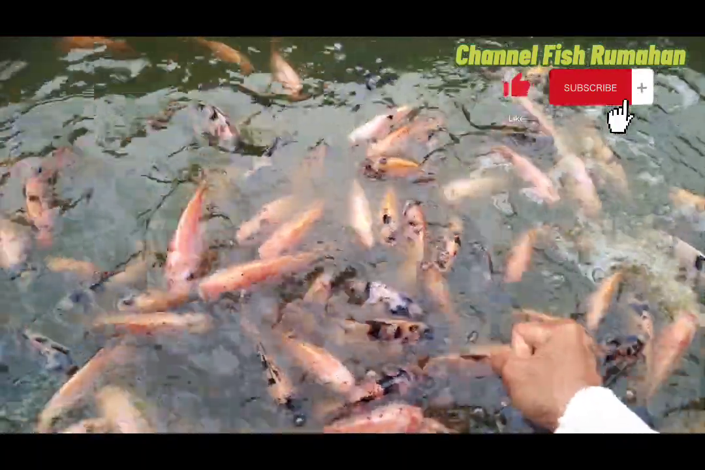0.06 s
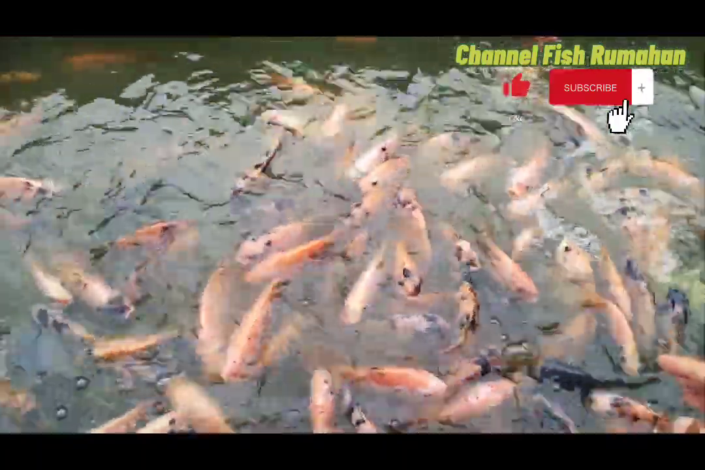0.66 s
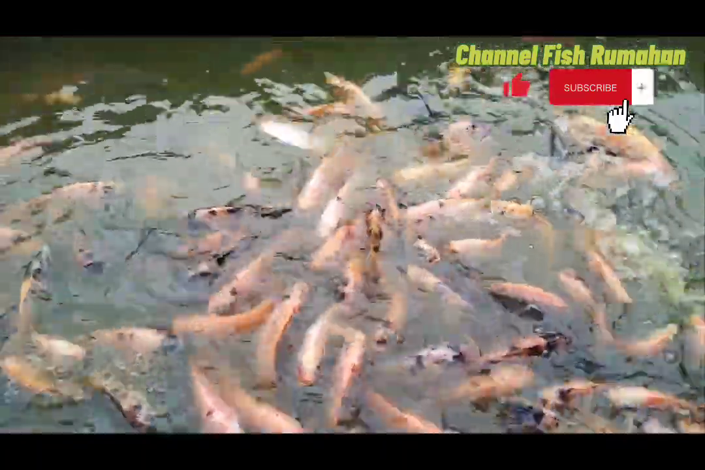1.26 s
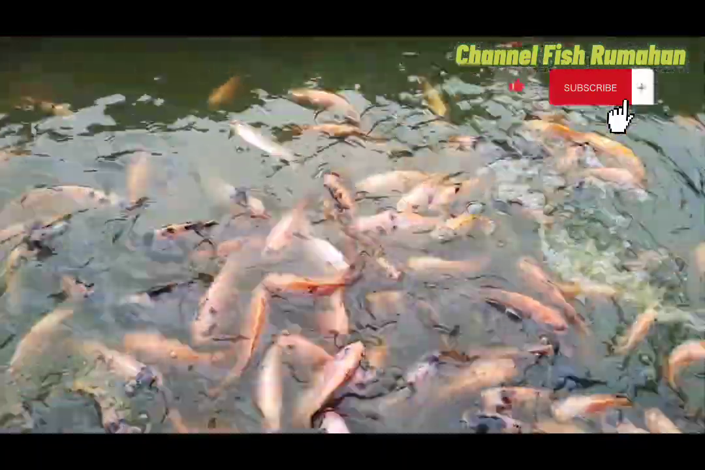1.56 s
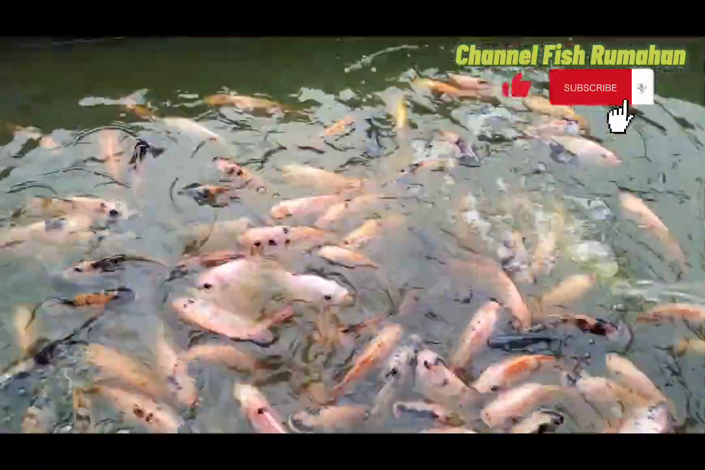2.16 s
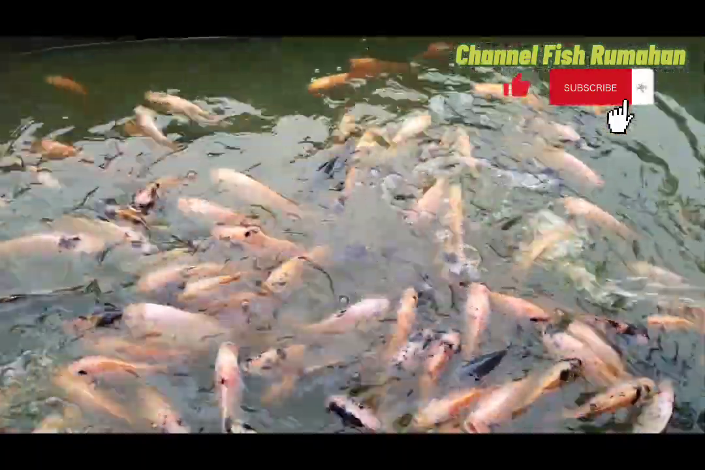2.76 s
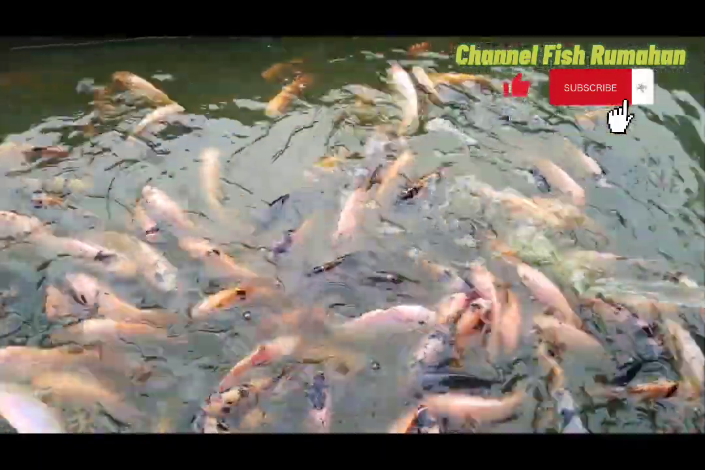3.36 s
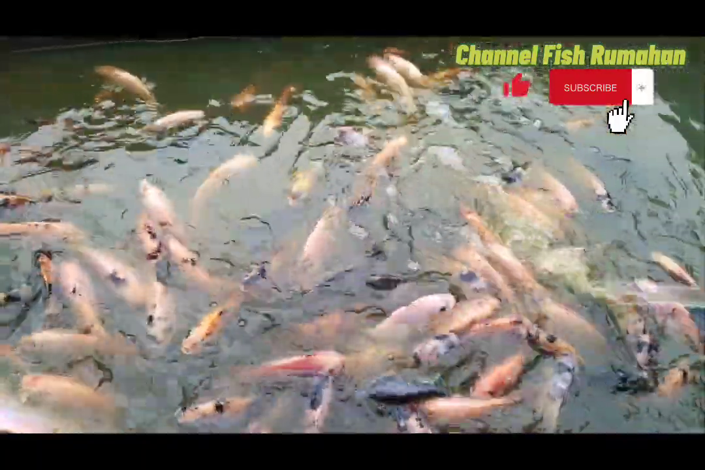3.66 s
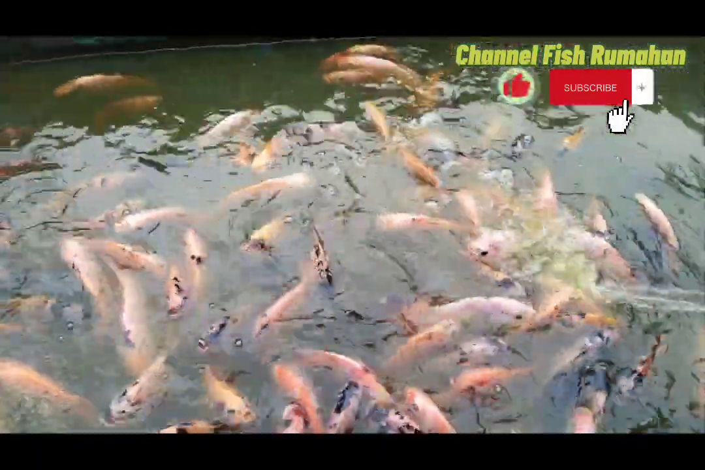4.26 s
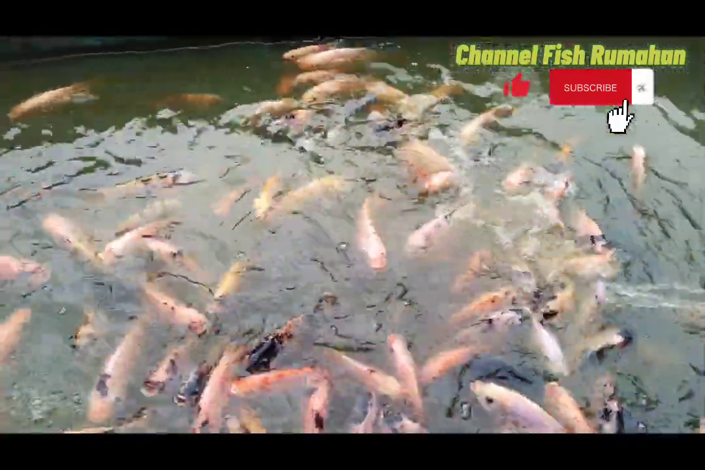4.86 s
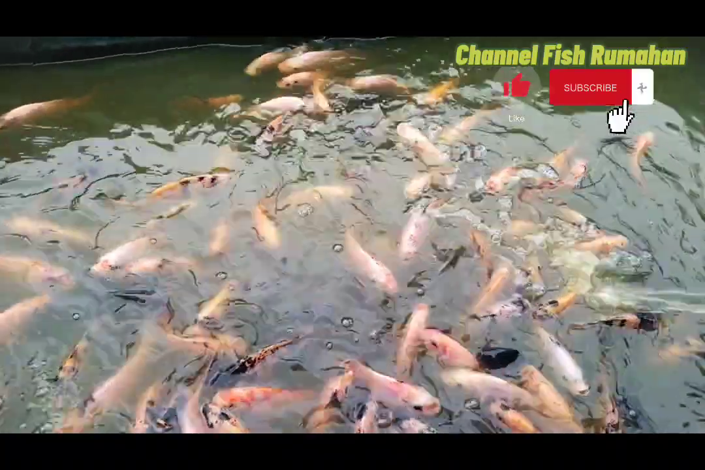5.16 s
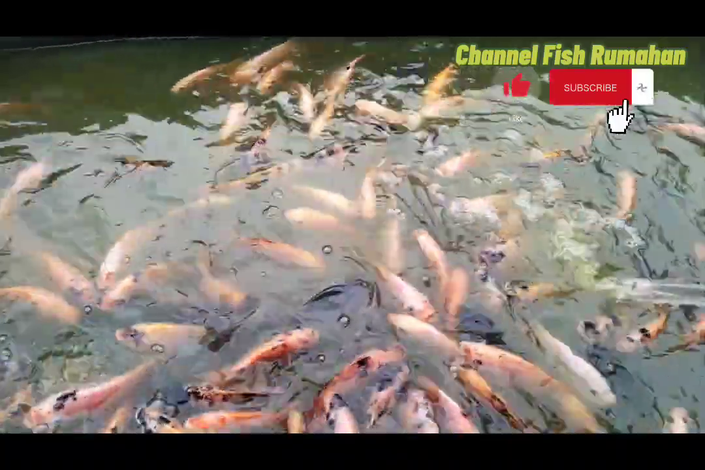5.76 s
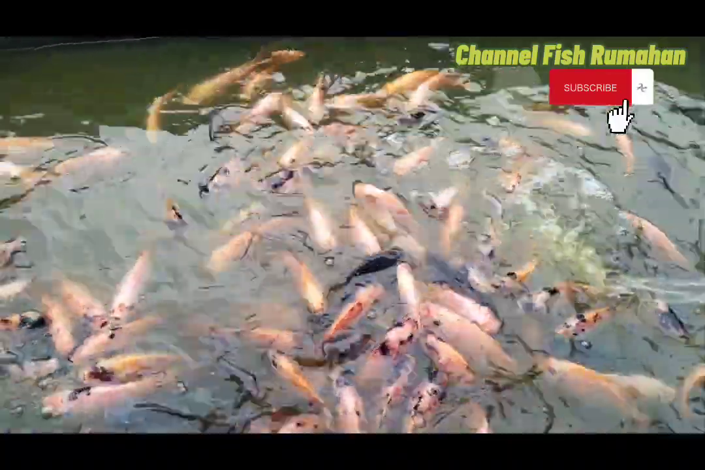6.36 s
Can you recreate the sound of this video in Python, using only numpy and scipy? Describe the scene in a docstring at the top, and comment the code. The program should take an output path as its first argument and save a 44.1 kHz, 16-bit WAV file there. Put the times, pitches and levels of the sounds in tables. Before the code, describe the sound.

A crowd of feeding fish thrashes at the surface of an outdoor pond, close to the microphone. Rapid small splashes overlap from start to finish, full of ringing bubbles, sharp plops, low gulps and soft sipping blips. Around the middle, several tail slaps thump and slosh. Thrown water tinkles back and a few hard drops land nearby. Behind it all, falling water fizzes steadily, briefly swelling to a gush in the second half.

```python
"""Fish thrash at the surface of a pond, close by; each thrash leaves a ringing cloud of bubbles.
Single bubbles plop, tail slaps thump and slosh, mouths gulp and sip air, fins open swirling hollows.
Thrown water falls back as tinkling bubbles; a few hard drops land close by.
Behind them is a steady fizz of falling water, at times swelling to a gush.
The single events echo off the banks, over still outdoor air."""
import sys
import numpy as np
from scipy import signal
from scipy.io import wavfile
from scipy.ndimage import uniform_filter1d

SR = 44100
rng = np.random.default_rng(int(sys.argv[2]) if len(sys.argv) > 2 else 0)


def unload_audio(sound):
    """Save the sound as a 16-bit wav file, at the path given as the first command line argument."""
    columns = np.transpose(np.atleast_2d(sound))
    # keep every value between -1 and 1, then stretch to whole-number steps
    steps = np.round(np.clip(columns, -1, 1) * 32767)
    wavfile.write(sys.argv[1], SR, steps.astype(np.int16))


N = 287399
T = np.arange(N) / SR

# bubble cloud per thrash: start_s, length_s, large_db, medium_db, small_db, large_pitch_hz
THRASHES = [(0, 0.007, -37, -59, -24, 1123), (0.042, 0.15, -37.5, -51, -31.5, 1180),
            (0.201, 0.26, -35.5, -36, -36.5, 1087), (0.55, 0.12, -31.5, -34.5, -33.5, 1007),
            (0.702, 0.05, -30.5, -48, -28.5, 1086), (0.857, 0.1, -31.5, -30, -34, 1344),
            (0.963, 0.23, -33, -28, -37, 1050), (1.119, 0.13, -48, -34, -31.5, 960),
            (1.311, 0.17, -43.5, -37.5, -31, 797), (1.582, 0.24, -47.5, -39, -32.5, 803),
            (1.693, 0.16, -34.5, -29, -36, 806), (1.902, 0.1, -36.5, -35.5, -32, 853),
            (2.028, 0.11, -44.5, -32.5, -27.5, 880), (2.169, 0.16, -32.5, -47, -31.5, 1205),
            (2.424, 0.16, -51, -38, -34, 830), (2.624, 0.44, -36.5, -39, -34, 769),
            (2.738, 0.21, -41, -28, -34, 884), (2.965, 0.15, -36, -28, -38, 1036),
            (3.131, 0.093, -46.5, -26.5, -29.5, 802), (3.237, 0.17, -32, -27.5, -36, 857),
            (3.41, 0.097, -42, -32, -35, 960), (3.739, 0.076, -31, -31.5, -32.5, 1060),
            (3.845, 0.27, -71, -32.5, -38, 1004), (4.01, 0.23, -41, -33, -57, 980),
            (4.229, 0.018, -64, -27, -26, 1080), (4.3, 0.1, -33.5, -35, -32, 845),
            (4.464, 0.11, -74, -34.5, -27.5, 930), (4.577, 0.19, -50, -35.5, -32.5, 960),
            (4.907, 0.096, -45, -31, -30.5, 802), (5.152, 0.095, -32.5, -33.5, -29.5, 1287),
            (5.381, 0.057, -24.5, -28, -31.5, 1280), (5.451, 0.22, -47, -36.5, -37, 1167),
            (5.622, 0.17, -35.5, -31.5, -45, 970), (5.74, 0.24, -37, -32, -39, 933),
            (6.092, 0.13, -35, -31, -39, 1083), (6.326, 0.16, -38.5, -32, -30, 1110)]


def thrashing():
    """Amplitude curves of large, medium and small bubbles: thrashes over the crowd's steady simmer."""
    simmer_db = (-61, -47.5, -38.5)
    power = amp(simmer_db)[:, None] ** 2 * np.ones(N)
    for start_s, length_s, *levels_db, _ in THRASHES:
        power += amp(levels_db)[:, None] ** 2 * stir_power(start_s, length_s, rise_s=0.021, t60_s=0.23)
    return np.sqrt(power)


def churn(envelopes):
    """Three sizes of bubble: the bigger, the deeper and rarer."""
    large = cloud(latest_pitch(THRASHES), octaves=0.526, per_s=150, t60_cycles=44, spread_db=3, glide=0.06)
    medium = cloud(1739.6, octaves=0.357, per_s=280, t60_cycles=96, spread_db=5, glide=0.0064)
    small = cloud(2993, octaves=0.596, per_s=600, t60_cycles=95, spread_db=5, glide=0.016)
    return sum(level * ringing(size) for level, size in zip(envelopes, [large, medium, small]))


def bubble(hz, t60_s, glide, onset_cycles):
    """An air pocket rings down; nearing the surface, its pitch climbs by the fraction glide per t60_s."""
    t = np.arange(int(1.2 * t60_s * SR) + 8) / SR
    cycles = hz * (t + glide * t ** 2 / (2 * t60_s))
    envelope = (1 - np.exp(-(cycles / onset_cycles) ** 2)) * np.exp(-np.log(1000) * t / t60_s)
    return envelope / envelope.max() * np.sin(2 * np.pi * cycles)


def cloud(centre_hz, octaves, per_s, t60_cycles, spread_db, glide):
    """Bubbles born at random times, scattered in pitch, level, life and glide."""
    out, centre_hz = np.zeros(N), centre_hz * np.ones(N)
    draws = np.random.default_rng(rng.integers(2 ** 31)).random((int(per_s * N / SR), 6))
    for when, up, down, strength, life, climb in draws:
        hz = centre_hz[int(when * N)] * 2 ** (octaves * (up - down))
        db = spread_db * min(-np.log(1 - strength), 4)
        t60_s = t60_cycles * (0.5 + life) / hz
        add(out, when * N / SR, amp(db) * bubble(hz, t60_s, 2 * glide * climb, onset_cycles=2.23))
    return out


def ringing(bubbles):
    """Bubbles get a ringing tone colour; narrow bands swell and fade at random. Unit power."""
    rung = colour(bubbles, ring_colour())
    return steady(shimmer(rung, depth_db=16.5, life_s=0.15, width_hz=100), span_s=0.066)


def ring_colour():
    """Fixed ringing peaks that colour the bubbles and splashes, summed to freq_hz, gain_db."""
    # centre_hz, width_hz, gain_db
    ring_peaks = [(294, 69, 6), (621, 116, 4), (763.6, 74, 7.5), (1100, 140, 0), (1338, 103, 8.5),
                  (1541.4, 61, 15), (1784, 215, 2), (1931, 55, 12), (2521, 23, 8), (2730, 162, 12.5),
                  (2912, 57, 8), (3080, 68, 6.5), (3450, 380, -0.5), (3678, 77, 8), (4235, 280, 3)]
    hz = np.geomspace(200, 6000, 500)
    power = sum(amp(db) ** 2 / (1 + ((hz - centre_hz) / (width_hz / 2)) ** 2) ** 1.36
                for centre_hz, width_hz, db in ring_peaks)
    return np.column_stack([hz, 10 * np.log10(power)])


def plops():
    """Single loud bubbles, each inside its own short splash."""
    # start_s, peak_db, pitch_hz, t60_s, splash_rel_db
    loud_bubbles = [(0.609, -18, 2520, 0.028, -7.5), (0.2176, -16.5, 2490, 0.035, -14),
                    (0.2878, -14.5, 886, 0.027, -13), (1.0238, -26, 817, 0.19, 4),
                    (1.092, -10.5, 2830, 0.017, -11), (1.1427, -10, 1520, 0.017, -2),
                    (1.267, -21.5, 3260, 0.012, -1), (1.343, -16, 1864, 0.038, -21),
                    (1.4222, -18.5, 2310, 0.025, -4.5), (1.721, -8.5, 2570, 0.0075, -37),
                    (1.8314, -26, 808, 0.11, -17), (1.833, -13, 1390, 0.0075, -7),
                    (1.8618, -3, 2830, 0.0075, -17.5), (1.992, -10, 1358, 0.04, -16.5),
                    (2.058, -11, 2550, 0.011, -14), (2.188, -15, 880, 0.0093, -1),
                    (2.4972, -8, 3120, 0.0089, -17), (2.5389, -17.5, 902, 0.028, -49),
                    (2.6142, -13, 2840, 0.025, -32), (2.7889, -8.5, 1590, 0.041, -7),
                    (2.861, -24.5, 1520, 0.07, 7.5), (3.028, -15.5, 1185, 0.049, -9),
                    (3.033, -19, 1630, 0.06, 3), (3.159, -12.5, 2800, 0.017, -30),
                    (3.2008, -27.5, 655, 0.074, -2), (3.2665, -15, 916, 0.042, -29),
                    (3.495, -13.5, 3020, 0.015, -6), (3.518, -8, 964, 0.021, -26),
                    (3.552, -13.5, 3400, 0.018, -11.5), (3.7655, -11, 950, 0.0052, -34),
                    (3.879, -4.5, 2650, 0.0084, -20), (4.0327, -12, 2890, 0.014, -13),
                    (4.038, -8.5, 843, 0.014, -22), (4.0382, -7.5, 1160, 0.018, -15),
                    (4.162, -19, 804, 0.029, -7.5), (4.2964, -13, 934, 0.019, -5),
                    (4.343, -22, 944, 0.03, -1), (4.3827, -14, 800, 0.0095, -10),
                    (4.616, -19, 970, 0.057, -3.5), (4.646, -14, 937, 0.015, -24),
                    (5.4026, -9, 2220, 0.0067, -46), (5.588, -18, 2940, 0.058, -9),
                    (5.716, -16.5, 2800, 0.013, -9), (5.717, -15.5, 1910, 0.027, -5),
                    (6.156, -13.5, 1780, 0.016, -22), (6.157, -13.5, 3610, 0.042, -37),
                    (6.342, -19.5, 3010, 0.025, -2.5)]
    out = np.zeros(N)
    for start_s, db, hz, t60_s, splash_rel_db in loud_bubbles:
        add(out, start_s, amp(db) * bubble(hz, t60_s, glide=0.085, onset_cycles=2.77))
        add(out, start_s, amp(db + splash_rel_db) * splash(hz))
    return out


def splash(hz):
    """Water tears around a bubble: a short rush with a ringing colour."""
    band = [(hz * 0.33, -28), (hz, 0), (hz * 1.29, 0), (hz * 1.96, -24)]
    rush = burst(band, attack_s=0.0014, decay_s=0.008, wash_db=-21, wash_s=0.023)
    rung = colour(rush, ring_colour())
    return rung * rush.std() / rung.std()


def burst(spectrum, attack_s, decay_s, wash_db, wash_s):
    """Rush of torn water: quick rise, fast fall, weaker wash."""
    t = np.arange(SR // 3) / SR
    envelope = (1 - np.exp(-t / attack_s)) * (np.exp(-t / decay_s) + amp(wash_db) * np.exp(-t / wash_s))
    noise = rng.standard_normal(len(t))
    return colour(noise * envelope / envelope.max(), spectrum) / colour(noise, spectrum).std()


def tail_slaps():
    """A tail shoves the water: a thump with a deep note, then the hollow rings as it sloshes shut."""
    # start_s, level_db, slosh_rel_db
    slaps = [(2.534, -32.5, -4), (2.771, -41.5, 2), (3.02, -28, 9.5), (3.262, -24.5, 8), (3.505, -24, -3),
             (3.753, -28, 9), (4.026, -26.5, 2.5), (4.612, -26, 8), (5.093, -43, -11)]
    # freq_hz, gain_db
    thump_spectrum = [(45, -43), (80, -20), (112, -2), (170, 0), (300, 6), (450, -9.5), (900, -58)]
    # freq_hz, gain_db
    slosh_spectrum = [(250, -20), (450, -7), (950, -10), (1500, -21), (3000, -19.5), (8000, -36)]
    # pitch_hz, level_re_slosh_db, t60_s
    hollow_modes = [(288, -19.5, 0.031), (581, -8.5, 0.029), (1000, -3, 0.04), (1218, -3, 0.059)]
    out = np.zeros(N)
    for start_s, db, slosh_rel_db in slaps:
        thump = burst(thump_spectrum, attack_s=0.015, decay_s=0.012, wash_db=-20.5, wash_s=0.1)
        add(out, start_s, amp(db - 6) * thump)
        add(out, start_s + 0.0026, amp(db - 0.5) * bubble(124, 0.033, glide=0.26, onset_cycles=1.3))
        slosh = burst(slosh_spectrum, attack_s=0.0052, decay_s=0.005, wash_db=-25, wash_s=0.043)
        add(out, start_s + 0.00343, amp(db + slosh_rel_db - 3) * colour(slosh, ring_colour()))
        for hz, mode_db, t60_s in hollow_modes:
            ring = bubble(hz, t60_s, glide=0.05, onset_cycles=2.8)
            add(out, start_s + 0.00526, amp(db + slosh_rel_db + mode_db) * ring)
    return out


def gulps(large_envelope):
    """A mouth gulps air: one deep bubble, then a dying gurgle. Large bubbles stir the gurgle too."""
    # start_s, peak_db, pitch_hz
    air_pockets = [(0.323, -21.5, 307), (1.139, -26.5, 365), (1.827, -32, 353), (2.108, -34, 330),
                   (2.167, -29, 288), (3.28, -24.5, 279), (3.811, -33.5, 285), (4.152, -32.5, 258),
                   (5.195, -35, 490), (5.272, -22, 333), (5.439, -31, 393), (5.582, -25.5, 296),
                   (5.647, -26, 277), (6.091, -27.5, 288), (6.174, -29, 306), (6.347, -34.5, 268)]
    stirred_rel_db, gurgle_rel_db = -27, -12
    out, power = np.zeros(N), (amp(stirred_rel_db) * large_envelope) ** 2
    for start_s, db, hz in air_pockets:
        add(out, start_s, amp(db) * bubble(hz, t60_s=0.11, glide=0.02, onset_cycles=2.2))
        power += amp(db + gurgle_rel_db) ** 2 * stir_power(start_s, 0, rise_s=0.027, t60_s=0.98)
    gurgle = cloud(307.3, octaves=0.51, per_s=87, t60_cycles=15.2, spread_db=-3, glide=0.29)
    return out + np.sqrt(power) * ringing(gurgle)


def sips():
    """A mouth sips at the surface and frees a bubble: a soft, rising blip."""
    # start_s, peak_db, pitch_hz
    blips = [(0.082, -20.5, 1020), (0.183, -19.5, 1175), (0.219, -20.5, 1284), (0.45, -21.5, 1028),
             (0.565, -27, 1510), (0.692, -20.5, 1520), (0.724, -22.5, 1272), (1.592, -18.5, 2566),
             (2.042, -25, 1014), (2.092, -16.5, 1514), (2.249, -20, 1246), (2.372, -24, 736),
             (2.448, -23.5, 1495), (2.83, -18, 1920), (2.858, -19.5, 3350), (3.837, -20.5, 1517),
             (3.997, -20, 1550), (5.521, -19, 1806), (5.678, -17, 1760), (5.878, -23.5, 1070),
             (6.435, -18, 1890)]
    out = np.zeros(N)
    for start_s, db, hz in blips:
        add(out, start_s, amp(db) * bubble(hz, t60_s=0.038, glide=0.08, onset_cycles=7.2))
    return out


def fin_swirls():
    """A fin opens a hollow whose noisy ring falls as it widens."""
    # start_s, level_db, start_pitch_hz
    hollows = [(1.002, -24, 2296), (1.1, -22, 2470), (5.403, -22, 2190), (5.951, -24.5, 2360),
               (6.043, -24, 2525), (6.094, -22.5, 2253)]
    life_s, floor_ratio, pole_width_hz = 0.041, 0.58, 320
    out, t = np.zeros(N), np.arange(int(2 * life_s * SR)) / SR
    age = t / life_s
    envelope = (1 - np.exp(-t / 0.0012)) * np.exp(-2 * age ** 2)
    pole = np.exp(-np.pi * pole_width_hz / SR)
    for start_s, db, hz in hollows:
        cycles = np.cumsum(hz * (floor_ratio + (1 - floor_ratio) * np.exp(-2 * age))) / SR
        noise = rng.standard_normal(len(t)) + 1j * rng.standard_normal(len(t))
        baseband = signal.lfilter([1], np.poly([pole, pole]), noise)
        ring = steady((baseband * np.exp(2j * np.pi * cycles)).real, span_s=0.012)
        add(out, start_s, amp(db) * envelope / envelope.max() * ring)
    return out


def tinkles():
    """Thrown water falls back and leaves tiny bubbles of much the same size."""
    # start_s, length_s, level_db, pitch_hz
    showers = [(0, 0.37, -34.5, 4030), (0.426, 0.023, -32, 4690), (0.545, 0.06, -32, 3920),
               (0.914, 0.4, -39, 5470), (1.28, 0.19, -41.5, 3980), (1.566, 0.03, -30, 4110),
               (1.9, 0.24, -41, 4140), (2.29, 0.11, -33, 6890), (2.498, 0.14, -32.5, 3610),
               (3.655, 0.081, -32.5, 3850), (3.869, 0.074, -33, 4490), (5.395, 0.026, -34, 5490),
               (6.333, 0.074, -39, 4600)]
    power = sum(amp(db) ** 2 * stir_power(start_s, length_s, rise_s=0.013, t60_s=0.24)
                for start_s, length_s, db, _ in showers)
    pitch_hz = latest_pitch(showers)
    tiny = cloud(pitch_hz, octaves=0.162, per_s=660, t60_cycles=390, spread_db=7.5, glide=0.0061)
    return np.sqrt(power) * steady(tiny, span_s=0.072)


def near_drops():
    """Hard drops land close by: a tick and a puff of mist each."""
    # start_s, peak_db, pitch_hz
    drops = [(0.162, -15, 6500), (1.0261, -13, 7700), (1.3134, -7, 8400), (2.4845, -6, 8000),
             (2.6045, -15, 7700), (4.1656, -16, 6800), (4.6669, -9, 7500), (4.7273, -8.5, 9800),
             (5.1769, -4.5, 11800)]
    out = np.zeros(N)
    for start_s, db, hz in drops:
        add(out, start_s, amp(db) * bubble(hz, t60_s=0.003, glide=0, onset_cycles=1))
        band = [(hz * 0.7, -9), (hz, 0), (hz * 1.96, -7)]
        mist = burst(band, attack_s=0.0004, decay_s=0.002, wash_db=-12, wash_s=0.018)
        add(out, start_s, amp(db - 15) * mist)
    return out


def falling_water(small_envelope):
    """Steady fizz of droplet ticks and plinks, at times a gush; its level follows the small bubbles."""
    # time_s, fizz_db, finest_db
    fall_levels = [(0, -33, -41.5), (.3, -36, -39.5), (.6, -32, -34.5), (.8, -39.5, -42), (1.0, -32.5, -36),
                   (1.35, -34, -38.5), (1.9, -35.5, -40.5), (2.52, -33, -42), (2.7, -37, -40),
                   (3.25, -34, -40), (3.82, -35, -42), (3.96, -31.5, -42.5), (4.45, -37.5, -40.5),
                   (4.58, -29, -31), (5.05, -31.5, -31.5), (5.3, -35.5, -37.5), (5.65, -35, -44.5),
                   (6.3, -31.5, -42), (6.52, -34, -43)]
    # freq_hz, gain_db
    fizz_spectrum = [(3900, -6.5), (4450, -8), (5000, 3.5), (5450, 1.5), (5950, -8.5), (6620, 8.5),
                     (7750, 7), (9500, 6.5), (11500, -10.5)]
    # freq_hz, gain_db
    finest_spectrum = [(8000, -27.5), (10000, 6), (11700, 3.5), (13500, 9), (15300, 14.5), (16000, 3)]
    gush_above_db, far_patter_db = -33, -55.5
    time_s, *levels_db = np.transpose(fall_levels)
    fizz_db, finest_db = (np.interp(T, time_s, db) for db in levels_db)
    flurries = unit_rms(uniform_filter1d(uniform_filter1d(rng.standard_normal(N), 900), 500))
    drops = droplet_ticks(per_s=3200, spread_db=4) * amp(2.1 * flurries)
    plinks = cloud(6700, octaves=0.7, per_s=460, t60_cycles=490, spread_db=2.5, glide=0)
    fizz = colour(unit_rms(drops) + amp(4.5) * unit_rms(plinks), fizz_spectrum)
    fizz = steady(shimmer(fizz, depth_db=11, life_s=0.26, width_hz=85), span_s=0.23)
    finest = shimmer(colour(drops, finest_spectrum), depth_db=12, life_s=0.12, width_hz=130)
    gush = steady(colour(drops, [(6000, -6), (7000, 10), (10000, -2.5)]), span_s=0.18)
    gush_share = np.clip((fizz_db - gush_above_db) / 5, 0, 1)
    coarse = np.sqrt(1 - gush_share) * fizz + np.sqrt(gush_share) * gush
    fall = amp(fizz_db) * coarse + amp(finest_db) * steady(finest, span_s=0.95)
    far_patter = unit_rms(colour(drops, [(3700, 1.5), (5800, -11)]))
    return fall * unit_rms(small_envelope ** 0.31) + amp(far_patter_db) * far_patter


def droplet_ticks(per_s, spread_db):
    """Droplets strike the surface: many faint, a few strong."""
    impulses = (rng.random(N) < per_s / SR) * rng.choice([-1, 1], N)
    return impulses * amp(spread_db * np.minimum(rng.exponential(1, N), 6))


def bank_echoes(x, t60_s, count=400):
    """Short scattered echoes from the sides of the pond."""
    taps, delays = np.zeros(SR // 4), rng.integers(SR // 250, SR // 4, count)
    taps[delays] = rng.standard_normal(count) * np.exp(-np.log(1000) * delays / SR / t60_s)
    return signal.oaconvolve(x, taps / np.linalg.norm(taps))[:N]


def still_air():
    """Faint, dull outdoor noise."""
    # freq_hz, gain_db
    air_spectrum = [(25, -10), (60, 1.5), (300, 8), (1000, 7), (4000, -26), (16000, -29)]
    return amp(-57) * unit_rms(colour(rng.standard_normal(N), air_spectrum))


def stir_power(start_s, length_s, rise_s, t60_s):
    """Power of one stir of the water: rise, hold, release."""
    age_s = T - start_s
    release = amp(-60 * np.clip((age_s - length_s) / t60_s, 0, 2))
    return np.clip(age_s / rise_s, 0, 1) ** 2 * release ** 2


def latest_pitch(table):
    """Per sample, the pitch of the event that began last."""
    rows = np.array(table)
    return rows[np.maximum(np.searchsorted(rows[:, 0], T) - 1, 0), -1]


def shimmer(x, depth_db, life_s, width_hz):
    """Narrow bands swell and fade at random."""
    hz, t, spectra = signal.stft(x, SR, nperseg=1024, noverlap=768)
    per_s, per_hz = np.fft.fftfreq(len(t), t[1]), np.fft.fftfreq(len(hz), hz[1])[:, None]
    blur = np.exp(-(per_s * life_s) ** 2 - (per_hz * width_hz) ** 2)
    field = unit_rms(np.fft.ifft2(np.fft.fft2(rng.standard_normal(spectra.shape)) * blur).real)
    return signal.istft(spectra * amp(depth_db * np.tanh(field)), nperseg=1024, noverlap=768)[1][:N]


def colour(x, spectrum, size=4096):
    """Minimum-phase filter through (freq_hz, gain_db) points; -24 dB/octave beyond the ends."""
    hz, db = np.transpose(spectrum)
    octave = np.log2(np.maximum(abs(np.fft.fftfreq(size, 1 / SR)), 5))
    beyond = abs(octave - np.clip(octave, np.log2(hz[0]), np.log2(hz[-1])))
    log_gain = np.log(amp(np.maximum(np.interp(octave, np.log2(hz), db) - 24 * beyond, -90)))
    taps = np.fft.ifft(np.exp(np.conj(signal.hilbert(log_gain)))).real
    return signal.oaconvolve(x, taps)[:len(x)]


def steady(x, span_s):
    """Holds power at 1 over span_s; keeps the faster grain."""
    window = signal.windows.hann(max(int(span_s * SR), 9))
    power = abs(signal.oaconvolve(x ** 2, window / window.sum(), "same"))
    return x / np.sqrt(power + 1e-4 * np.mean(x ** 2))


def amp(db):
    return 10 ** (np.asarray(db) / 20)


def unit_rms(x):
    return x / np.sqrt(np.mean(x ** 2) + 1e-20)


def add(mix, start_s, sound):
    part = mix[max(round(start_s * SR), 0):][:len(sound)]
    part += sound[:len(part)]


def scene():
    """Churn, gulps, tinkles and fizz; single events with their echoes; quiet air. Mono."""
    large, medium, small = thrashing()
    water = churn([large, medium, small]) + gulps(large) + tinkles() + falling_water(small)
    events = plops() + sips() + fin_swirls() + tail_slaps() + near_drops()
    air = still_air()
    return (water + events + amp(-6.5) * bank_echoes(events, t60_s=0.32) + air)[None]


def record(dry):
    """Steep low-pass."""
    cutoff_hz = 15750
    return signal.oaconvolve(dry, signal.firwin(401, cutoff_hz, window=("kaiser", 8), fs=SR)[None], "same")


dry = scene()
out = record(dry)
unload_audio(out)
```